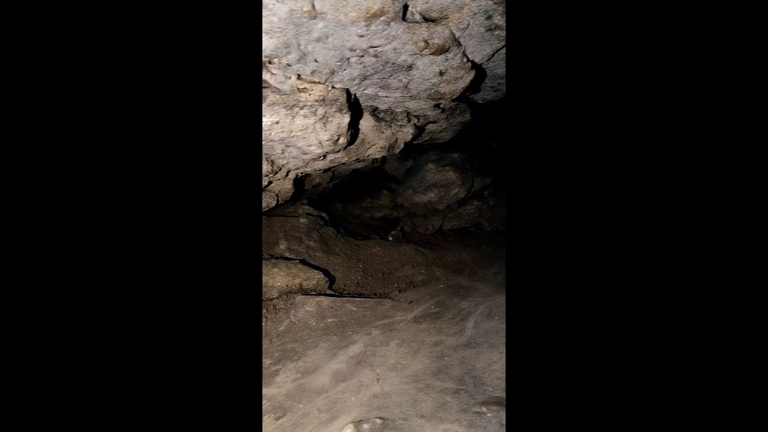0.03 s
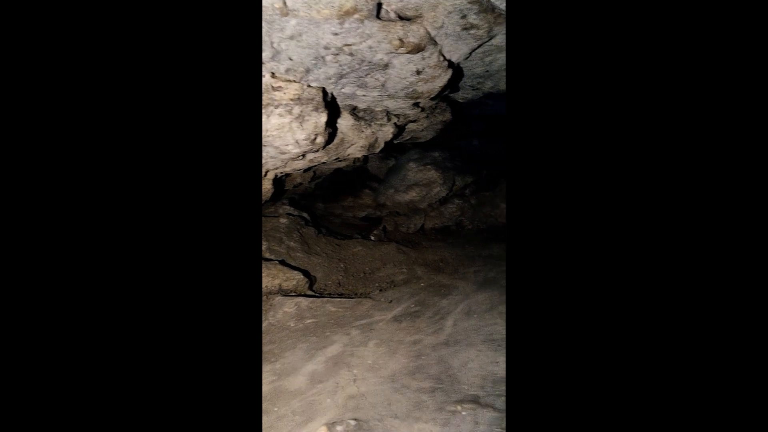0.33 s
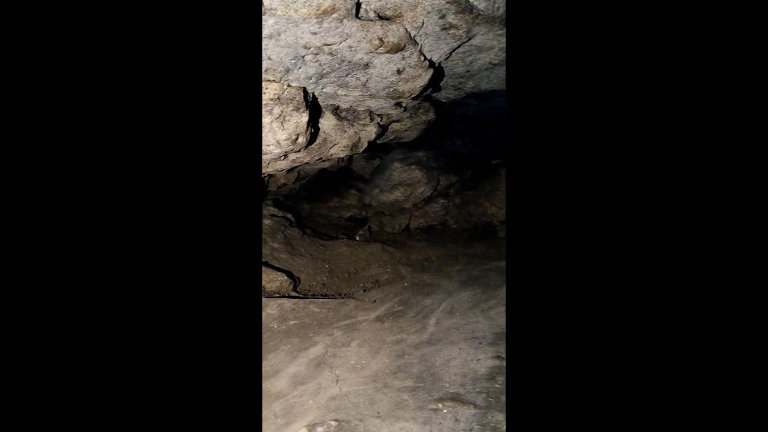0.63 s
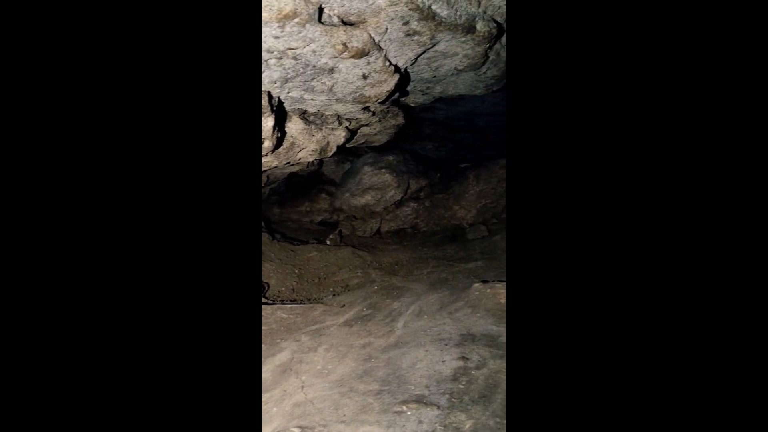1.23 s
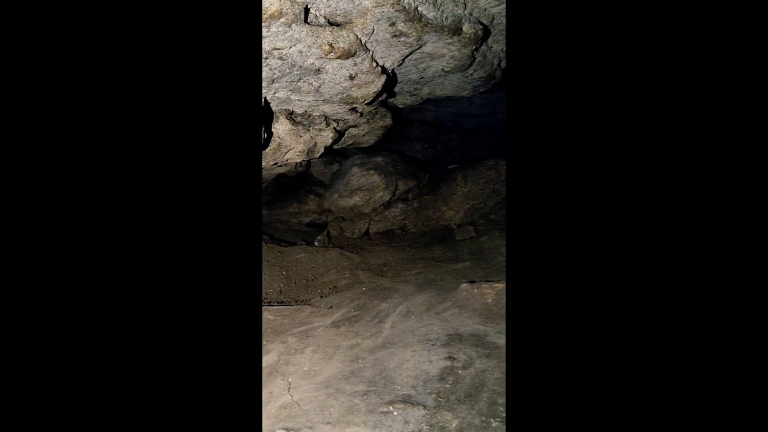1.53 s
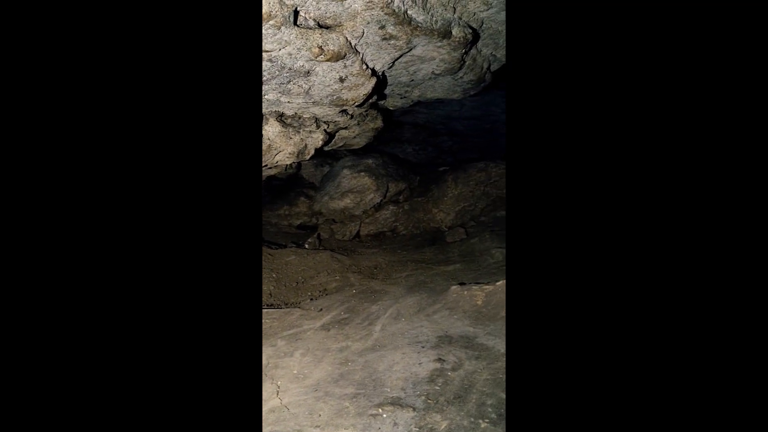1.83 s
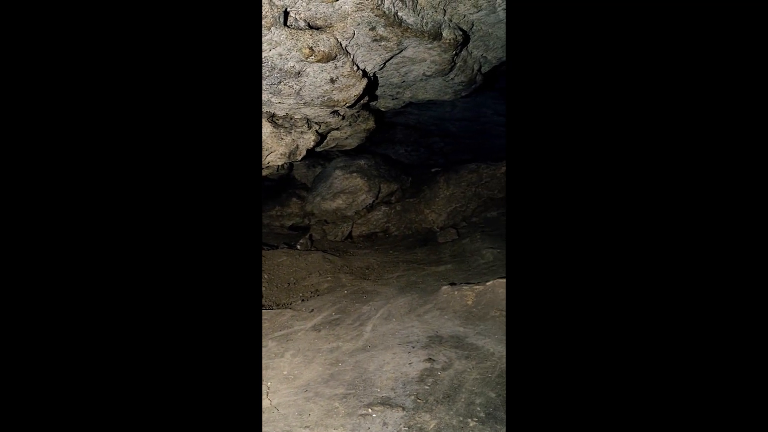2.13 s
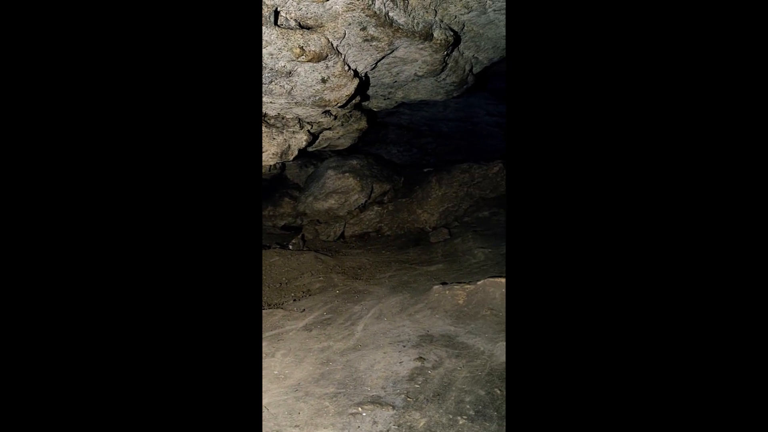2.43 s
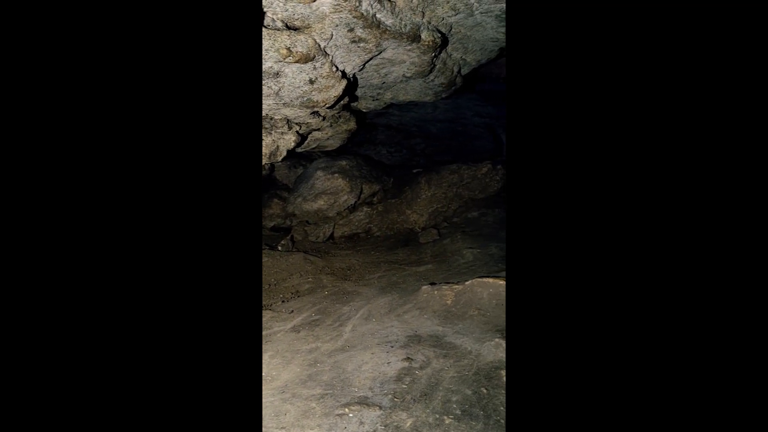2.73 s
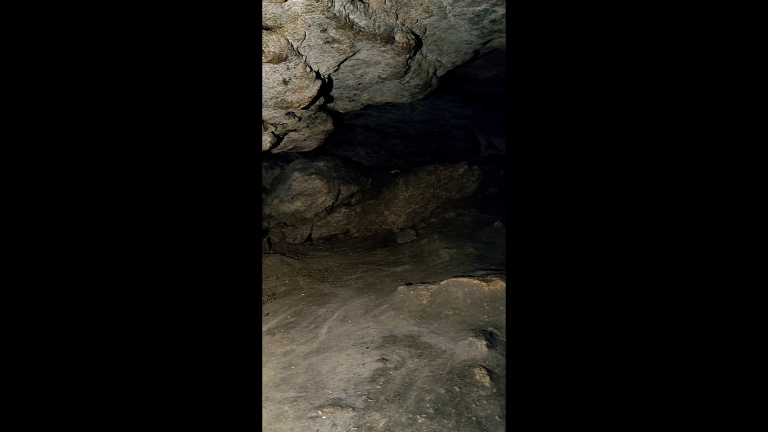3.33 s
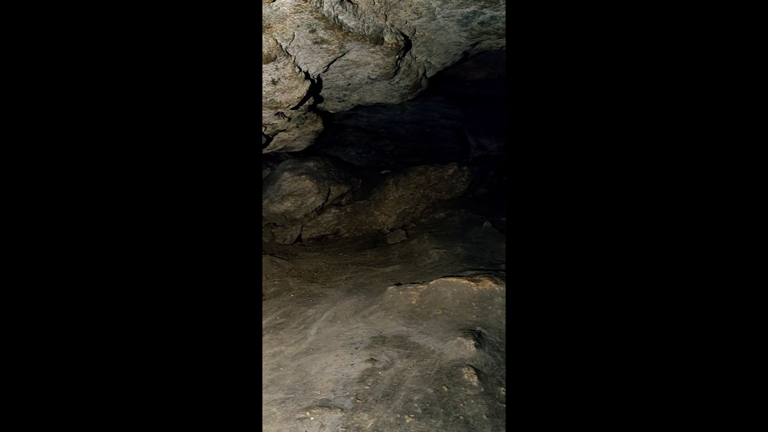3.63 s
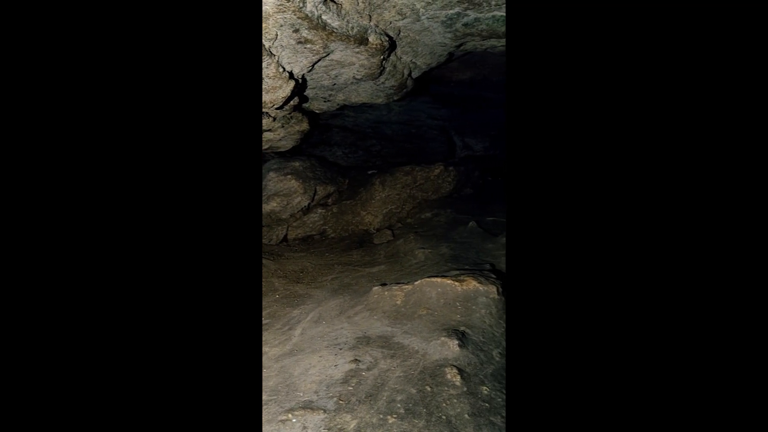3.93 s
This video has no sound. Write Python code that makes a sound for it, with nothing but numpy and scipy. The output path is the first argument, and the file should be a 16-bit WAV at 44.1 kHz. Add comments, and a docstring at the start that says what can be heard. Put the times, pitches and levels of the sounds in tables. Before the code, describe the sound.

A faint deep hum pulses two to three times a second throughout, over low air rumble and soft microphone hiss in a quiet cave. A small handling tap comes at about 0.4 seconds. Very faint bumps and tiny grip creaks follow around 1.8 and 2.7 seconds. The clearest soft bump lands at 3.4 seconds, with several weaker ones until 4 seconds. Nearby rock adds a short dull echo.

```python
"""A quiet cave, heard from a hand-held camera.
Two deep hums, perhaps from distant machines, beat against each other over a faint rumble of air
and the hiss of two microphones. The hand on the camera makes small taps, soft bumps and tiny
creaks, which the nearby rock returns as a short dull tail."""
import sys
import numpy as np
from scipy import signal
from scipy.fft import rfft, irfft
from scipy.io import wavfile
from scipy.ndimage import uniform_filter1d

SR = 44100
rng = np.random.default_rng(int(sys.argv[2]) if len(sys.argv) > 2 else 0)


def unload_wav(signal):
    """Save mono or channel-first audio to the path in sys.argv[1] as 16-bit WAV at rate SR, clipped to [-1, 1]."""
    wavfile.write(
        sys.argv[1],
        SR,
        np.round(np.clip(np.atleast_2d(signal).T, -1, 1) * 32767).astype(np.int16),
    )


N = 176400


def amp(db):
    """Decibels to gain."""
    return 10 ** (np.asarray(db) / 20)


def unit(x):
    """Scale to rms 1."""
    return x / np.sqrt(np.mean(x ** 2) + 1e-30)


def add(mix, start_s, sound):
    """Mix a sound in at start_s."""
    part = mix[..., max(round(start_s * SR), 0):][..., :sound.shape[-1]]
    part += sound[..., :part.shape[-1]]


def pan(side_db):
    """Left and right gains, side_db apart."""
    return amp([[side_db / 2], [-side_db / 2]])


def decay(t, t60_s):
    """Fall of 60 dB in t60_s."""
    return np.exp(-np.log(1000) * t / t60_s)


def mode(t, hz, t60_s, db=0):
    """One damped resonance."""
    return amp(db) * decay(t, t60_s) * np.sin(2 * np.pi * hz * t)


def patchy_noise(spectrum, drift_db):
    """Coloured noise, rms 1; the level drifts in small patches of time and frequency."""
    cells = signal.stft(rng.standard_normal(N), nperseg=2048)[2]
    drift = uniform_filter1d(rng.standard_normal(cells.shape), size=12, axis=0)
    drift = unit(uniform_filter1d(drift, size=3, axis=1))
    white = signal.istft(cells * amp(drift_db * drift), nperseg=2048)[1][:N]
    hz, db = np.transpose(spectrum)
    colour_db = np.interp(np.log(np.fft.rfftfreq(N, 1 / SR) + 1), np.log(hz + 1), db)
    return unit(irfft(rfft(white) * amp(colour_db), N))


def air_rumble():
    """Faint low noise of the cave air, alike in both channels."""
    # rumble spectrum (frequency [Hz], relative density [dB])
    spectrum = [(3, 0), (20, -2), (38, -4.5), (55, -4.5), (66, -3.5), (90, -14), (120, -18), (160, -17),
                (210, -24.5), (270, -26), (500, -35), (1500, -59), (16000, -83)]
    return amp(-59) * patchy_noise(spectrum, drift_db=1)


def microphone_hiss():
    """Each microphone hisses independently, coloured by its port resonance."""
    # hiss spectrum (frequency [Hz], relative density [dB])
    spectrum = [(53, -32), (75, 5), (110, 0), (232, -5), (345, -6.5), (505, -8), (575, -8.5), (886, -10.5),
                (1520, -13), (2290, -14), (6040, -13), (8530, -21), (10100, -25), (14300, -21.5),
                (15600, -21.5)]
    # port resonances, left then right (centre [Hz], half-width [Hz], lift [dB])
    ports = [(6330, 290, 2), (8730, 590, 4)]
    # hiss contour, applied about its mean (time [s], level [dB])
    contour = [(0.0, -69), (0.03, -68.5), (1.78, -68.5), (1.8, -66.5), (1.85, -69), (3.3, -68), (3.85, -69),
               (4.0, -68)]
    hz = np.fft.rfftfreq(N, 1 / SR)
    sides = []
    for centre_hz, width_hz, lift_db in ports:
        port_gain = amp(lift_db * np.exp(-((hz - centre_hz) / width_hz) ** 2))
        hiss = patchy_noise(spectrum, drift_db=1.5)
        sides.append(irfft(rfft(hiss) * port_gain, N))
    times_s, db = np.transpose(contour)
    wander_db = np.interp(np.arange(N) / SR, times_s, db - db.mean())
    return np.array(sides) * amp(-62 + wander_db)


def rock_reverb(sound, t60_s=0.32, top_hz=2560, gain_db=-18):
    """Short dull tail reflected by the nearby rock."""
    t = np.arange(SR // 2) / SR
    lowpass = signal.butter(1, top_hz, fs=SR)
    tail = signal.lfilter(*lowpass, rng.standard_normal((2, len(t)))) * decay(t, t60_s)
    tail /= np.linalg.norm(tail[0])
    return amp(gain_db) * signal.fftconvolve(sound, tail, axes=1)[:, :N]


def tap(t, cut_hz, snap_db=-18, snap_decay_s=0.0028):
    """A short snap and the ringing of the camera body."""
    # body modes (frequency [Hz], relative level [dB], t60 [s])
    body = [(145, 5.5, 0.029), (254, -1.5, 0.018), (450, -8.5, 0.057), (596, -13, 0.05), (747, -3.5, 0.045),
            (1090, -2.5, 0.021), (1490, -25, .02), (2296, -9, 0.019), (4940, -17, 0.017),
            (6130, -15, 0.022)]
    ring = sum(mode(t, hz, t60_s, db) for hz, db, t60_s in body)
    snap = amp(snap_db) * np.exp(-t / snap_decay_s) * rng.standard_normal((2, len(t)))
    return signal.lfilter(*signal.butter(1, cut_hz, "high", fs=SR), ring + snap)


def bump(t, hz, t60_s, rise_s=0.00054):
    """A soft push rocks the camera in the hand and faintly rings its shell."""
    push = mode(t, hz, t60_s)
    thud = mode(t, hz=125, t60_s=0.022, db=-11.5)
    shell = mode(t, hz=457, t60_s=0.03, db=-23)
    return -2 * (1 - np.exp(-t / rise_s)) * (push + thud + shell)


def creak(t, hz, width, decay_s, rise_s=0.00021):
    """A brief slip of the grip excites one resonance."""
    peak = signal.iirpeak(hz, 1 / width, SR)
    slip = rng.standard_normal((2, len(t)))
    ring = unit(signal.lfilter(*peak, signal.lfilter(*peak, slip)))
    return ring * (1 - np.exp(-t / rise_s)) * np.exp(-t / decay_s)


def handling(left_lag_s=0.0014):
    """The hand on the camera; each bump reaches the left port later."""
    # a tap, its rebound, a later light tap (time [s], gain [dB], bass cut [Hz])
    taps = [(0.3899, -45.5, 49.7), (0.4215, -54, 1000), (2.690, -61, 500)]
    # hand bumps (time [s], gain [dB], pitch [Hz], t60 [s], left minus right [dB])
    bumps = [(.015, -56.5, 159, 0.02, 0), (.228, -53.5, 400, 0.0084, -9), (1.742, -56, 268, 0.02, 0),
             (1.88, -52.5, 185, 0.016, 0), (2.691, -50.5, 290, 0.012, 12), (3.403, -41, 240, 0.0096, 4.5),
             (3.616, -53, 315, 0.014, -7), (3.714, -56, 190, 0.012, 0), (3.833, -54.5, 189, 0.027, -7),
             (3.9242, -49.5, 181, 0.05, -1.5)]
    # grip creaks (time [s], gain [dB], pitch [Hz], width [x pitch], decay [s], left minus right [dB])
    creaks = [(.806, -66, 2620, .4, .005, -5), (1.466, -64, 1430, .4, .005, -8),
              (1.724, -65, 7200, 0.45, .008, -11), (2.822, -65, 1800, .4, .005, -5),
              (3.274, -67, 1500, .4, .005, -4), (3.306, -63.5, 8350, .4, 0.017, -4),
              (3.517, -61, 1620, 0.15, 0.009, -5)]
    t = np.arange(SR // 10) / SR
    out = np.zeros((2, N))
    for start_s, db, cut_hz in taps:
        add(out, start_s, amp(db) * tap(t, cut_hz))
    for start_s, db, hz, t60_s, side_db in bumps:
        left, right = amp(db) * pan(side_db) * bump(t, hz, t60_s)
        add(out[0], start_s + left_lag_s, left)
        add(out[1], start_s, right)
    for start_s, db, hz, width, decay_s, side_db in creaks:
        add(out, start_s, amp(db) * pan(side_db) * creak(t, hz, width, decay_s))
    return out


def hums(gain_db=3.5, beat_peak_s=0.392, sag_start_s=2.57):
    """Two deep tones, close enough to beat; the beat quickens when the lower one sags."""
    # hums (pitch [Hz], level before gain [dB], 2nd and 3rd harmonic [dB re fundamental], sag [Hz])
    tones = [(36.44, -55, -12, -26, .26), (39.0, -52.4, -36, -40, 0)]
    t = np.arange(N) / SR
    since_sag_s = np.maximum(t - sag_start_s, 0)
    offset_cycles = rng.random()
    out = np.zeros(N)
    for hz, db, second_db, third_db, sag_hz in tones:
        phase = 2 * np.pi * (hz * (t - beat_peak_s) - sag_hz * since_sag_s + offset_cycles)
        harmonics = amp(second_db) * np.cos(2 * phase) + amp(third_db) * np.cos(3 * phase)
        out += amp(db) * (np.cos(phase) + harmonics)
    return amp(gain_db) * out


def scene():
    """Hums, rumble and hiss, plus the handling and its reverb."""
    hand = handling()
    return hums() + air_rumble() + microphone_hiss() + hand + rock_reverb(hand)


def record(dry):
    """Steep low-pass band limit."""
    edge_hz = 15760
    lowpass = signal.firwin(1023, edge_hz, window=("kaiser", 9), fs=SR)
    return signal.oaconvolve(dry, lowpass[None], "same")


dry = scene()
out = record(dry)
unload_wav(out)
```